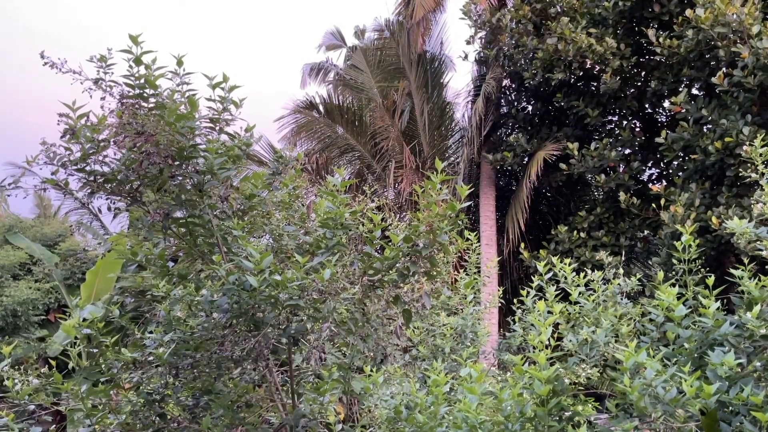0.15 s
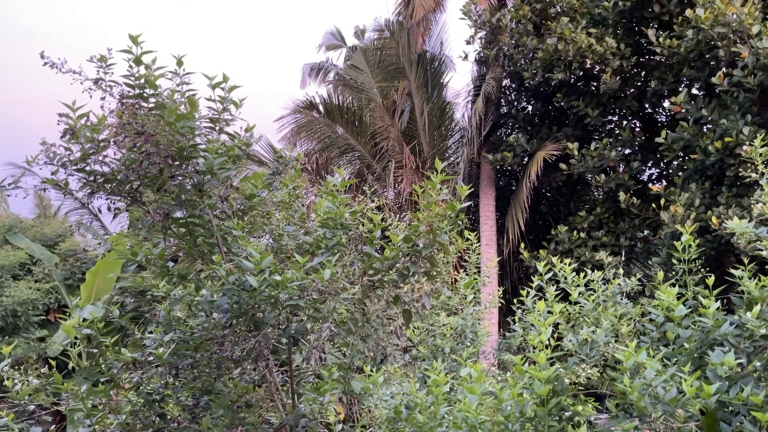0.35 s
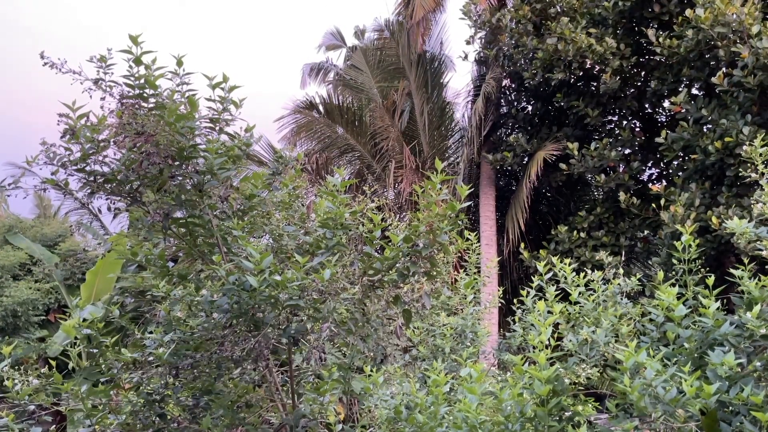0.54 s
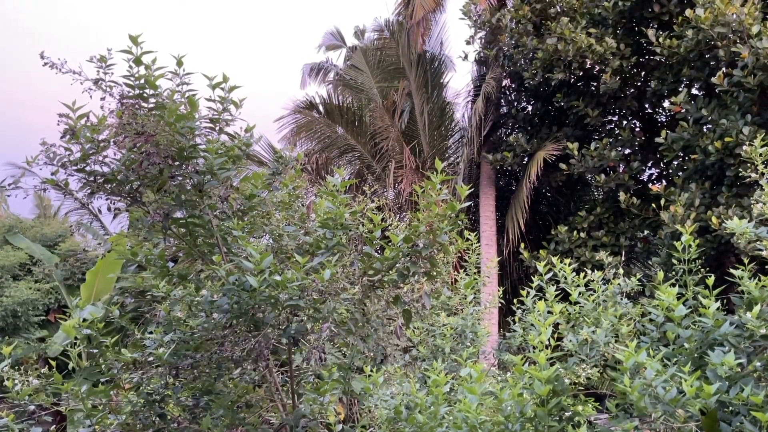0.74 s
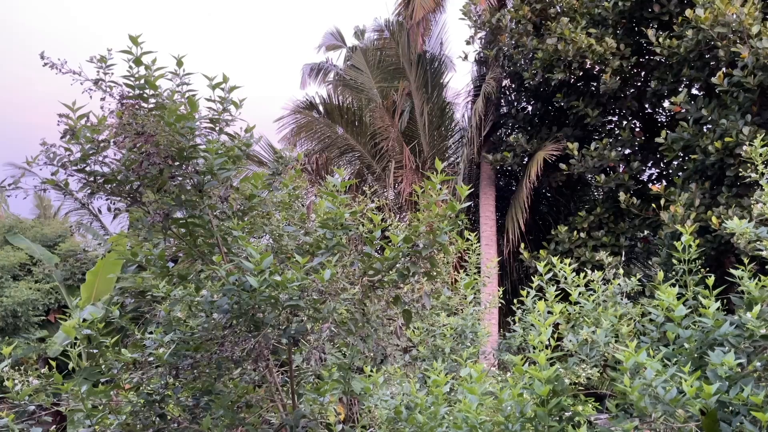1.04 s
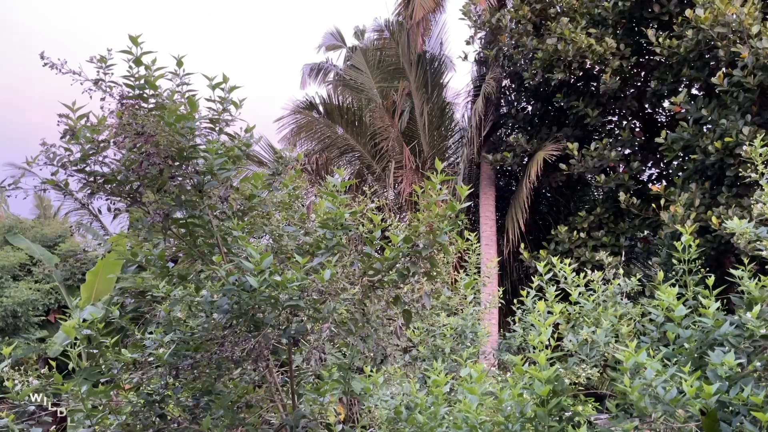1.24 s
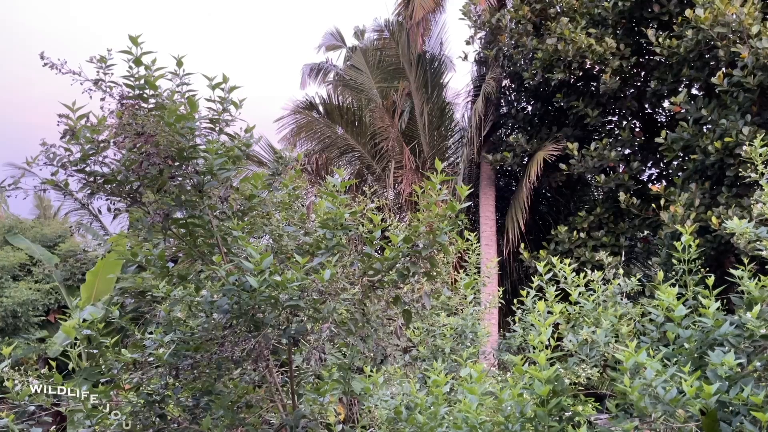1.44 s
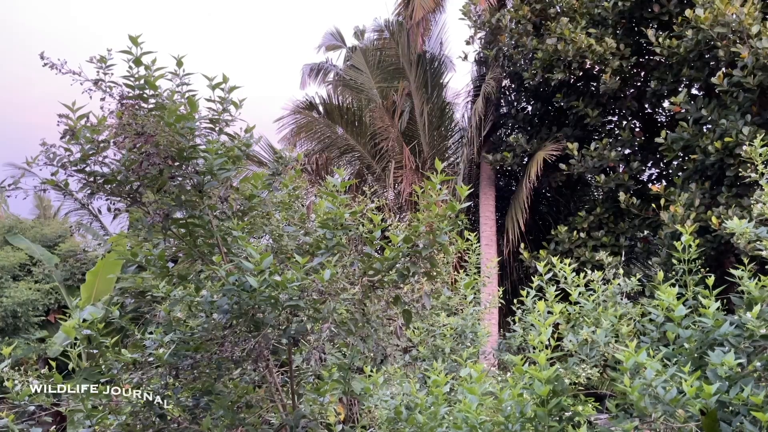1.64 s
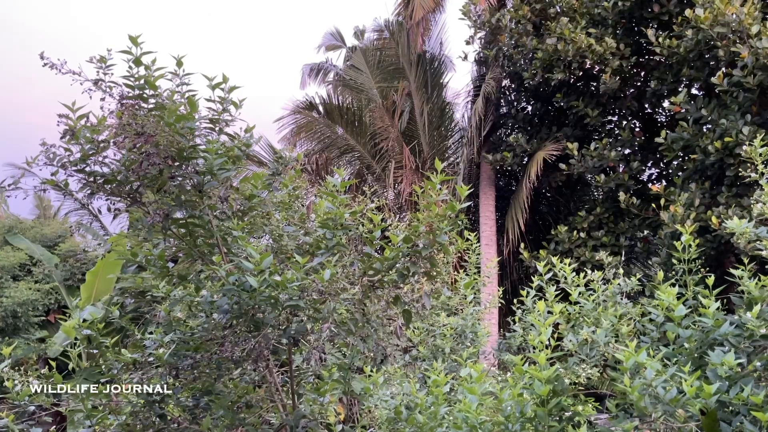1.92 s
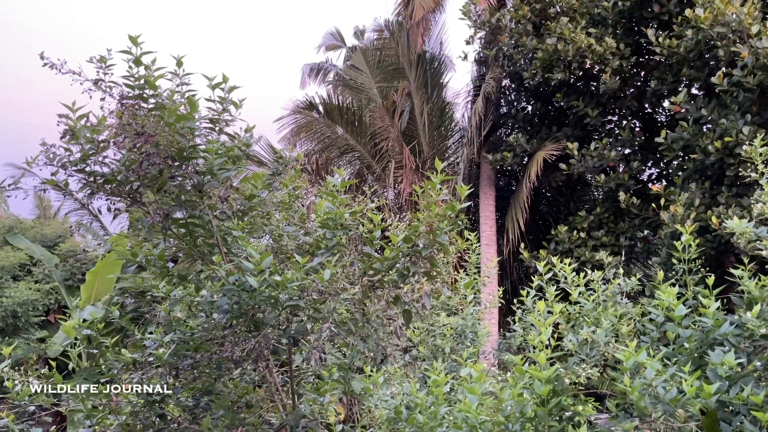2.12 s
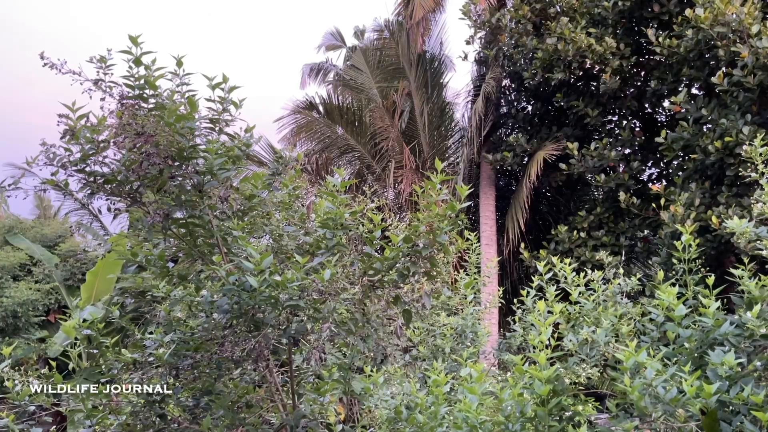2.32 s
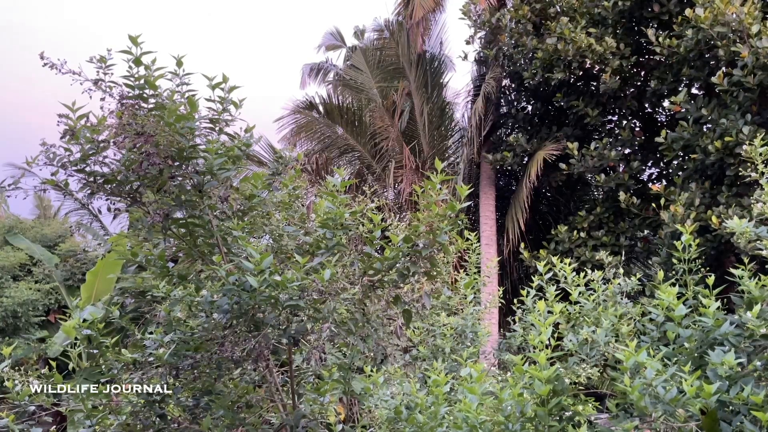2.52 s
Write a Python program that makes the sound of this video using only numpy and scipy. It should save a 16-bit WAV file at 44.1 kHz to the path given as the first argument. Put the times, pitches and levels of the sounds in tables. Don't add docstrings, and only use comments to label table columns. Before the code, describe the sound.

Two identical loud bird calls, clear whistles climbing to a hoarse top before falling, ring among trees and walls. Between them come faint far chirps, with constant high cicadas, leaf hiss and distant town rumble, heard outdoors in stereo.

```python
import sys
import numpy as np
from scipy import signal
from scipy.fft import rfft, irfft
from scipy.io import wavfile
from scipy.ndimage import uniform_filter1d

SR = 44100
rng = np.random.default_rng(int(sys.argv[2]) if len(sys.argv) > 2 else 0)


def wav_record(signal):
    frames = np.transpose(np.atleast_2d(signal))
    bounded = np.clip(frames, -1, 1)
    quanta = np.round(bounded * 32767).astype(np.int16)
    wavfile.write(sys.argv[1], SR, quanta)


def how_loud(loudness_db):
    steps = np.asarray(loudness_db, float) / 20
    return 10 ** steps


N = 117747
LEAD = 3000


def evened(x):
    return x / np.sqrt(np.mean(x ** 2) + 1e-20)


def read(points, hz):
    f, value = np.transpose(points)
    return np.interp(np.log(hz + 1), np.log(f + 1), value)


def slow(n, size):
    drift = uniform_filter1d(rng.standard_normal(n), size)
    return evened(uniform_filter1d(drift, size))


def ports(a, b, alike):
    # frequency in Hz, lead of the right port in radians.
    port_phase = [(0, -2), (1500, 4), (2500, 5), (5000, 8), (7400, 4.5), (8500, 6.5), (11800, 12.5)]
    alike = np.clip(alike, 0, 1)
    hz = np.fft.rfftfreq(len(a), 1 / SR)
    lead = np.interp(hz, *np.transpose(port_phase))
    turned = irfft(rfft(a) * np.exp(1j * lead), len(a))
    return np.array([a, alike * turned + np.sqrt(1 - alike ** 2) * b])


def air():
    # frequency in Hz, density in dB per Hz.
    air_spectrum = [(28, -10.5), (48, -2.5), (120, 0.35), (230, -8.5), (500, -11.5), (800, -19),
                    (2000, -32.5), (5200, -50), (9000, -72)]
    # frequency in Hz, likeness from -1 to 1.
    likeness = [(60, 0.99), (170, 0.83), (500, 0.063), (1440, 0.36), (4160, -0.037), (12000, -0.35)]
    frames, hz = N // 256 + 5, np.fft.rfftfreq(1024, 1 / SR)
    a, b, c, d, patches = rng.standard_normal((frames, 513, 5)).T
    patches = uniform_filter1d(patches, size=8, axis=0)
    patches = evened(uniform_filter1d(patches, size=14, axis=1))
    same = np.clip(read(likeness, hz), -1, 1)[:, None]
    left, other = a + 1j * b, c + 1j * d
    z = np.array([left, same * left + np.sqrt(1 - same ** 2) * other])
    z *= how_loud(read(air_spectrum, hz)[:, None] + 1.36 * patches)
    noise = signal.istft(z, nperseg=1024, noverlap=768)[1][:, :N]
    return how_loud(-54 + np.array([[1.4], [-.3]])) * evened(noise)


def chirps():
    # start in seconds, length in seconds, first pitch in Hz, last pitch in Hz, level in dB.
    far_chirps = [
        (.9, .04, 3650, 3500, -83),
        (1.2, .09, 3550, 3400, -84),
        (1.43, .045, 4150, 3800, -80),
        (1.08, .04, 990, 990, -66),
        (1.44, .04, 840, 820, -67),
        (.755, .04, 11900, 11300, -78),
    ]
    out, t = np.zeros(N), np.arange(N) / SR
    for start, length, first_hz, last_hz, db in far_chirps:
        u = np.clip((t - start) / length, 0, 1)
        turn = 2 * np.pi * np.cumsum(first_hz + (last_hz - first_hz) * u) / SR
        out += how_loud(db) * np.sin(np.pi * u) * np.sin(turn)
    return out


def stridulation(song, body):
    rate, depth, db, alike, pan_db = song
    hz = np.fft.rfftfreq(N, 1 / SR)
    ring = np.sqrt(sum((how_loud(d) / (1 + (2 * (hz - f) / w) ** 2)) ** 2 for f, w, d in body))
    a, b = irfft(rfft(rng.standard_normal((2, N))) * ring, N)
    turn = 2 * np.pi * np.cumsum(rate * (1 + 0.0044 * slow(N, size=6000))) / SR
    swell = np.cos(turn) + 0.55 * np.cos(2 * turn + 2.0)
    swell += 0.63 * np.cos(3 * turn + 0.93) + 0.24 * np.cos(4 * turn)
    pulse = (1 + depth * swell) * how_loud(1.56 * slow(N, size=5000))
    return evened(ports(a * pulse, b * pulse, alike)) * how_loud(db + np.array([[.5], [-.5]]) * pan_db)


def cricket():
    # frequency in Hz, width in Hz, level in dB.
    cricket_song = (23.5, -0.08, -76, 1, 1.5), [(2873, 240, 0.1)]
    # centre in seconds, length in seconds, rise in dB.
    bursts = [
        (0.566, 0.072, 4),
        (.7, .04, 4.5),
        (.82, .06, 7.5),
        (1.037, .05, 3.5),
        (1.117, 0.026, 3.5),
        (1.412, 0.055, 2),
        (1.703, 0.024, 4),
        (1.92, 0.058, 3.5),
        (2.61, 0.091, -1),
    ]
    t = np.arange(N) / SR
    burst_db = sum(db * np.exp(-((t - s) / w) ** 2) for s, w, db in bursts)
    return how_loud(burst_db - 3) * stridulation(*cricket_song)


def cicadas():
    # frequency in Hz, width in Hz, level in dB.
    near_song = (131, 0.12, -57, 0.67, 0.1), [(8890, 540, -16), (9006, 320, -12), (9340, 360, -9.2),
                 (9578, 237, -7), (9880, 100, -18)]
    second_song = (120, 0.4, -73, 2.8, -0.5), [(8020, 560, -0.1), (8700, 890, -0.8)]
    chorus_song = (24.5, 0.08, -66.5, 0.6, 4), [(5680, 220, -8.5), (6066, 360, 1), (6453, 380, 2.5)]
    return sum(stridulation(*song) for song in (near_song, second_song, chorus_song))


def drone():
    # frequency in Hz, level in dB.
    buzz_lines = [(131.4, -63.5), (262.4, -64), (393.5, -69)]
    out = np.zeros(N)
    for hz, db in buzz_lines:
        turn = 2 * np.pi * np.cumsum(hz + 1.54 * slow(N, size=3000)) / SR
        out += how_loud(db + 1.5 + 3.8 * slow(N, size=3000)) * np.sin(turn)
    return out


def garden():
    # frequency in Hz, time to fall by 60 dB in seconds.
    decay = [(900, 1.42), (1500, 1.114), (2700, 0.86), (5500, 1.01), (11000, 0.31)]
    # delay in seconds, length in seconds, rise in dB.
    clumps = [
        (0.028, 0.023, 4.6),
        (0.076, 0.031, 4.7),
        (.21, 0.04, 2.4),
    ]
    taps = np.zeros((2, SR))
    at = np.arange(300, SR - 30, 30) + rng.integers(0, 30, (2, (SR - 301) // 30))
    np.put_along_axis(taps, at, rng.choice([-1., 1.], at.shape), 1)
    t = np.arange(SR) / SR
    taps *= how_loud(sum(db * np.exp(-((t - s) / w) ** 2) for s, w, db in clumps))
    hz, frame, z = signal.stft(taps, SR, nperseg=256)
    z = z * how_loud(-60 * frame / read(decay, hz)[:, None])
    tail = signal.istft(z, SR, nperseg=256)[1][:, :SR]
    tail = tail * how_loud(2) / np.linalg.norm(tail[0])
    tail = np.pad(tail, ((0, 0), (LEAD, LEAD)))
    tail[0, LEAD] += 1
    return ports(*tail, alike=0.55)


def call(t, start, factor, db, push_db):
    # time from the start in seconds, pitch in Hz, effort in dB, hoarseness from 0 to 1.
    call_shape = [
        (0, 1247, -22.5, 0.1),
        (0.019, 1441, -7.5, 0.1),
        (0.102, 1322, -4, 0.1),
        (.21, 1341, -4, .05),
        (.27, 1448, 0, 0),
        (.325, 1568, -4, 0.37),
        (.36, 1546, -0.5, 0.93),
        (0.411, 1248, -10, .9),
        (0.481, 882, -24.5, 0),
    ]
    overtones_db = [1, -30, -35, -26, -24, -31, -54, -35.5, -39.5]
    # frequency in Hz, gain in dB.
    throat = [(1500, -0.07), (2700, 1.5), (3300, -2.5), (4400, -5.5), (5350, 7.5), (5900, -4), (10700, -4),
              (11450, 1)]
    # frequency in Hz, density in dB per Hz.
    rasp_spectrum = [(1500, -16.5), (1900, -3.3), (2300, -14.5), (3600, -28), (6100, -16), (8000, -10),
                     (10200, -22.5), (11300, -2.5), (12100, -41)]
    n, release_s = len(t), 0.028
    s, *curves = np.transpose(call_shape)
    hz, effort_db, hoarse = (uniform_filter1d(np.interp(t - start, s, v), size=500) for v in curves)
    turn = 2 * np.pi * np.cumsum(factor * hz * (1 + .0012 * slow(n, size=300))) / SR
    tone = np.zeros(n)
    for k, d in enumerate(overtones_db, 1):
        fade = 1 - 0.49 * np.clip(hoarse, 0, 1) * (k > 3)
        tone += np.sqrt(2) * how_loud(d + read(throat, k * hz)) * np.sin(k * turn) * fade
    colour = how_loud(read(rasp_spectrum, np.fft.rfftfreq(n, 1 / SR)))
    rasp = evened(irfft(rfft(rng.standard_normal(n)) * colour, n))
    voice = tone + how_loud(-12) * hoarse ** 2 * rasp
    attack = np.clip((t - start) / 0.0013, 0, 1)
    release = np.clip((start + s[-1] + release_s - t) / release_s, 0, 1)
    return attack * release * how_loud(db + effort_db + push_db * hoarse) * voice


def bird():
    # start in seconds, pitch factor, level in dB, extra push at the hoarse top in dB.
    calls_at = [
        (-.168, 1, -36.5, -0.1),
        (1.972, 1.0, -37, 2),
    ]
    t = np.arange(-SR // 2, N) / SR
    calls = sum(call(t, *row) for row in calls_at)
    heard = signal.fftconvolve(calls[None], garden(), axes=1)[:, SR // 2 + LEAD:][:, :N]
    return heard * how_loud([[-2.3], [-3]])


def scene():
    return air() + chirps() + cricket() + cicadas() + drone() + bird()


def masked(x):
    # frequency in Hz, limit in dB relative to the loudest partial.
    mask_limit = [(1450, -70), (1620, -40), (1950, -50), (2400, -54), (3500, -61), (4900, -52), (7300, -57),
                  (9000, -70)]
    hz, _, z = signal.stft(x, SR, nperseg=1024, noverlap=768)
    power = uniform_filter1d((abs(z) ** 2).mean(0), size=5, axis=1)
    band_db = 10 * np.log10(uniform_filter1d(power, size=7, axis=0) + 1e-20)
    loudest_db = 10 * np.log10(power.max(0) + 1e-20)
    treble_db = np.where(hz > 10100, -97, -200)[:, None]
    limit_db = np.maximum(loudest_db + read(mask_limit, hz)[:, None], treble_db)
    return signal.istft(z * (band_db > limit_db), SR, nperseg=1024, noverlap=768)[1][:, :N]


def band_limit(x):
    return signal.sosfilt(signal.butter(12, 12620, fs=SR, output="sos"), x)


def record(dry):
    x = signal.oaconvolve(dry, signal.firwin(511, 12550, fs=SR)[None], "same")
    x = signal.sosfilt(signal.butter(4, 42, "high", fs=SR, output="sos"), x)
    return band_limit(masked(x))


dry = scene()
out = record(dry)
wav_record(out)
```